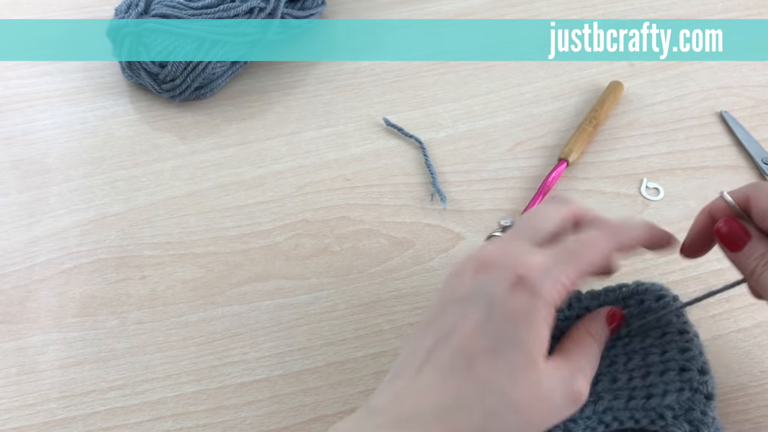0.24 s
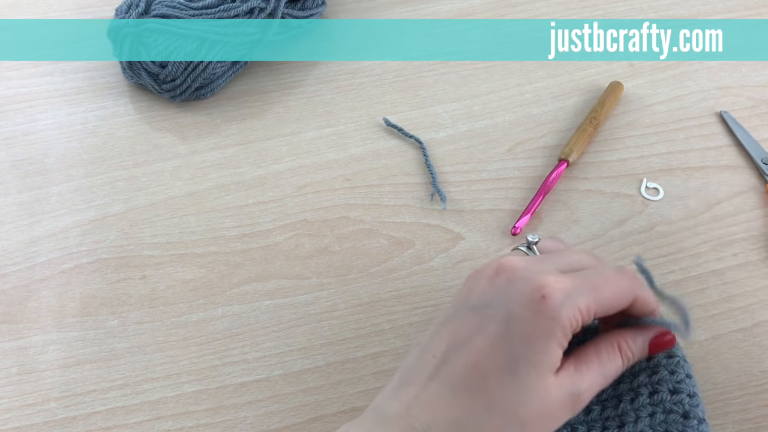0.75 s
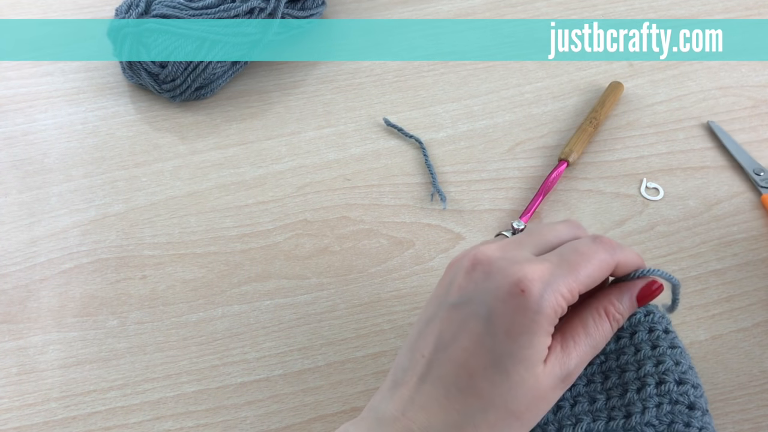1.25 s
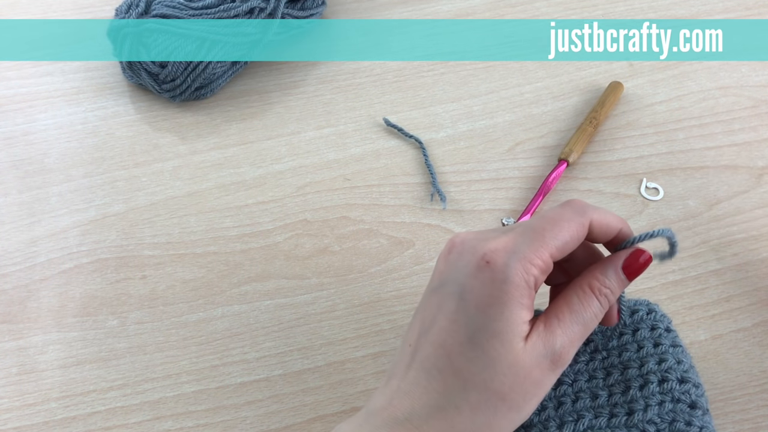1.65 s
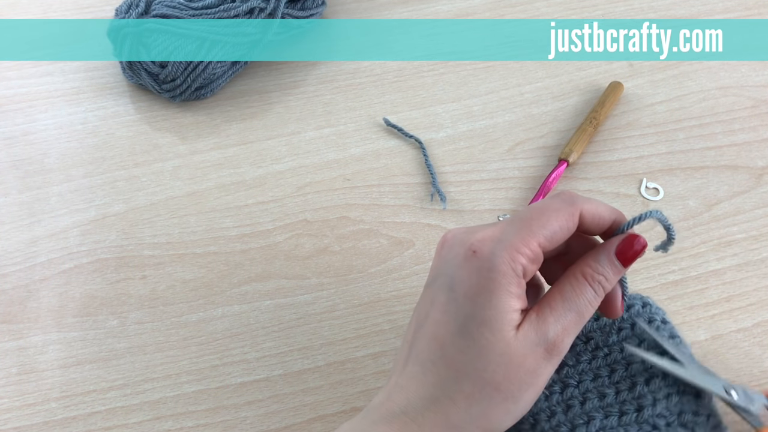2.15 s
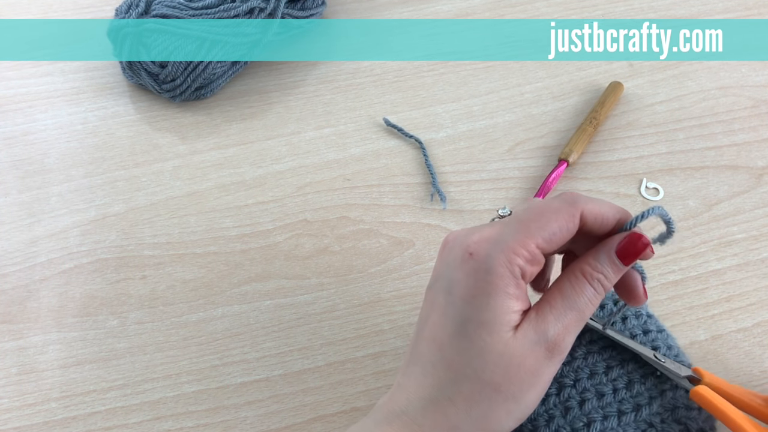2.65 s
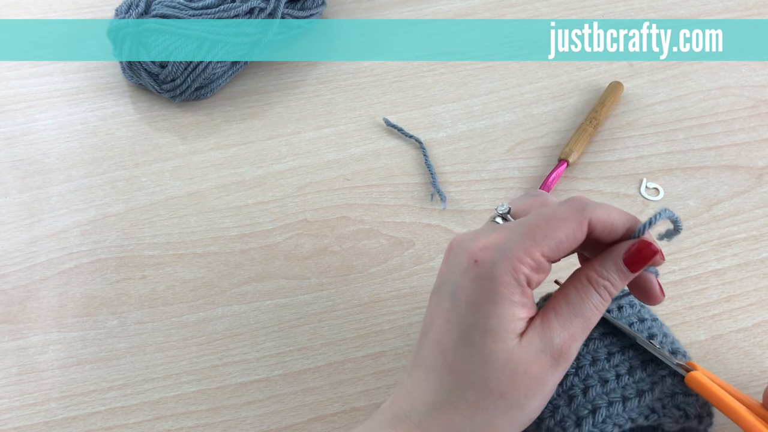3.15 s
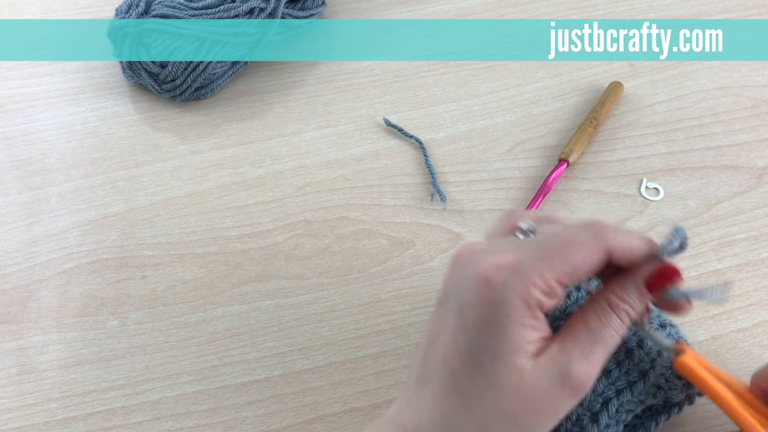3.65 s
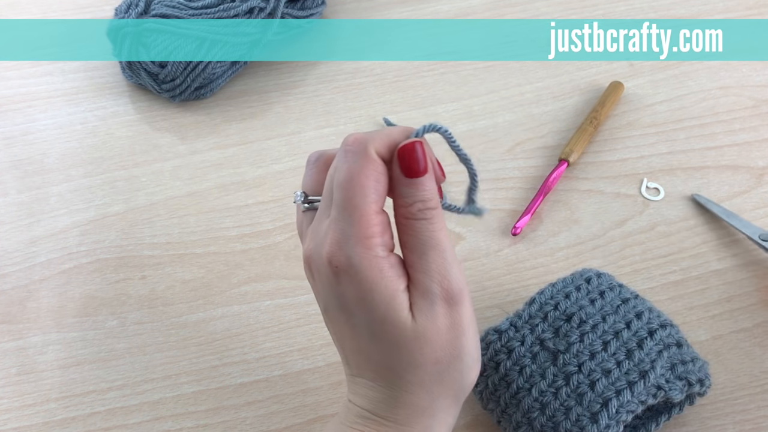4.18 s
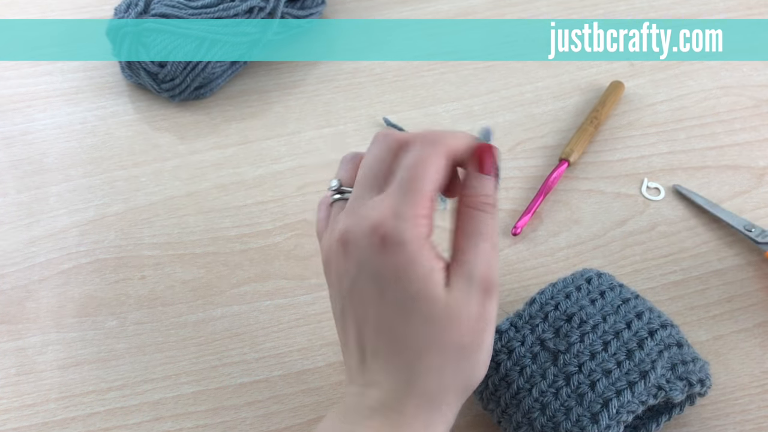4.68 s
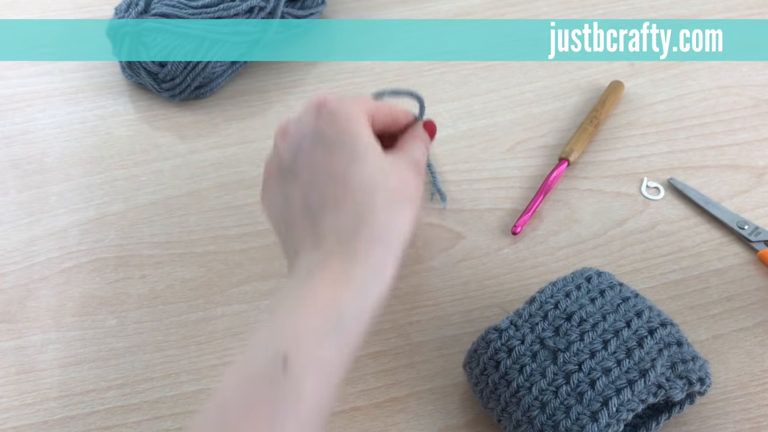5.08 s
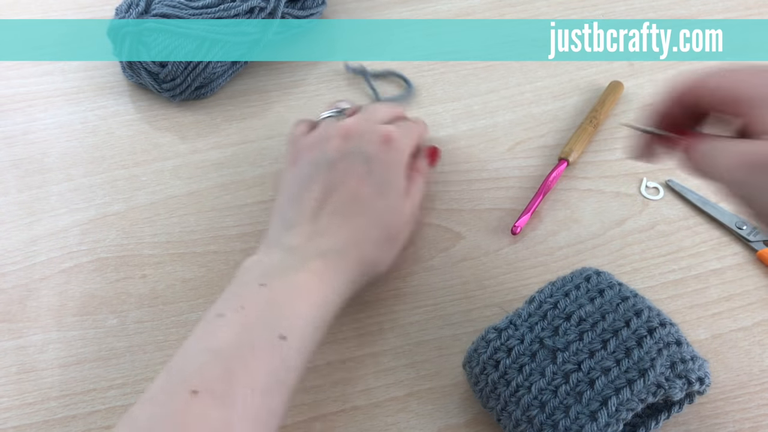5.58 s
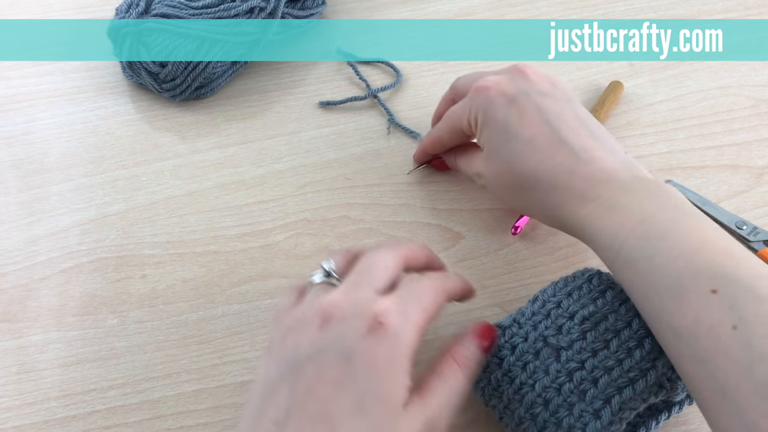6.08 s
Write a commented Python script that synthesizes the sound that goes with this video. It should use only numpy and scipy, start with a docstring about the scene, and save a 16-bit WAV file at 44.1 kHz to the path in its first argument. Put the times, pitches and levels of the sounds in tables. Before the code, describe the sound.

Close at a table in a small, quiet, lightly reverberant room, yarn rustles faintly, then scissors clink as they are picked up. Two soft blade hisses snip yarn. The scissors knock down and slide slightly, a small hard thing drops with a bright clatter and rocks to rest, and a steel needle rattles sharply at the end. Low wavering hum and faint hiss lie beneath.

```python
"""Scissors, yarn and a needle at a craft table

Close under a phone in a small quiet room, scissors are picked up, snip a strand of yarn and are laid down.
A small hard thing drops and rocks to rest; a steel needle clatters on the table top. Yarn rustles.
Contacts are short noise bursts that ring a body and thud the table; rubs are noise sent through resonances.
A low wavering hum and microphone hiss, both shaped noise, lie under it all."""
import sys
import numpy as np
from scipy import signal
from scipy.fft import rfft, irfft
from scipy.io import wavfile
from scipy.ndimage import uniform_filter1d

SR = 44100
rng = np.random.default_rng(int(sys.argv[2]) if len(sys.argv) > 2 else 0)


def inscribe(sig):
    """Save sig as 16-bit PCM at rate SR to the path in sys.argv[1].

    A 1-D sig is mono; a 2-D sig holds one channel per row.
    Samples are clipped to [-1, 1] before scaling.
    """
    pcm = np.round(np.clip(np.atleast_2d(sig).T, -1, 1) * 32767)
    wavfile.write(sys.argv[1], SR, pcm.astype(np.int16))


N = 278883  # length in samples


def undb(db):
    """Turn decibels into a gain."""
    return 10 ** (np.asarray(db) / 20)


def unit_rms(x):
    """Scale to rms 1."""
    return x / np.sqrt(np.mean(x ** 2))


def unit_peak(x):
    """Scale to peak 1."""
    return x / np.max(np.abs(x))


def band(x, low_hz, high_hz):
    """Keep only the sound between two frequencies."""
    return signal.sosfilt(signal.butter(2, [low_hz, high_hz], "bandpass", fs=SR, output="sos"), x)


def resonance(x, hz, width_hz):
    """One resonance, gain 1 at its centre."""
    b, a = signal.iirpeak(hz, hz / width_hz, SR)
    return signal.lfilter(b, a, x)


def ring_body(x, modes, damping):
    """A body rings at several pitches; more damping widens each one, so it dies sooner."""
    rung = 0
    for k, (hz, width_hz, db) in enumerate(modes):
        sign = (-1) ** k
        damped_hz = width_hz * damping
        gain = undb(db) * np.sqrt(hz / damped_hz / 4)
        rung = rung + sign * gain * resonance(x, hz, damped_hz)
    return rung


def rub_loudness(rubs):
    """Each rub swells and fades in straight decibel lines."""
    edge_db = 25.5  # a rub starts and ends this far under its peak
    t = np.arange(N) / SR
    gain = np.zeros(N)
    for start, swell, fade, peak_db in rubs:
        end = start + swell + fade
        level_db = np.interp(t, [start, start + swell, end], [peak_db - edge_db, peak_db, peak_db - edge_db])
        gain += np.where((t > start) & (t < end), undb(level_db), 0)
    return uniform_filter1d(gain, size=64)


def rub(rubs, modes, damping, plain_db, scatter_db, low_hz=600, top_hz=15500):
    """Rubbing is many dense slips of uneven size, heard plain and through a body. Rows: direct, to the room."""
    # every 32 samples the slips get a new random size
    sizes = np.repeat(rng.exponential(size=N // 32 + 1).clip(0, 2), 32)[:N]
    slips = band(rng.standard_normal(N) * undb(scatter_db * sizes), low_hz, top_hz)
    texture = unit_rms(undb(plain_db) * slips + ring_body(slips, modes, damping))
    return rub_loudness(rubs) * texture * undb([[0], [-9]])


# The table top's low tones: (pitch [Hz], width before damping [Hz], level [dB])
TABLE_TONES = [(143, 40, 0), (200, 40, -1), (277, 25, 0), (400, 110, -2)]
# One narrow tone that lingers in the table top: (pitch [Hz], width before damping [Hz], level [dB])
TABLE_LINGER = [(322, 7, 4)]


def table_thud(click, linger_db):
    """A blow on the table top sets off its low tones and one lingering tone."""
    low_tones = ring_body(click, TABLE_TONES, 0.77)
    lingering = ring_body(click, TABLE_LINGER, 0.77)
    return unit_peak(low_tones - undb(linger_db) * lingering)


def blows(taps, modes, touch):
    """A contact clicks, chatters for a few ms, rings a body and thuds the table. Rows: direct, to the room."""
    ring_db, damping, contact_ms, edge_db, top_hz, linger_db, room_db = touch
    out = np.zeros((2, N + SR))
    t = np.arange(SR // 2) / SR
    click = signal.unit_impulse(len(t))
    thud = table_thud(click, linger_db)
    body_ring = ring_body(click, modes, damping)
    for s, db, body_db, treble_db, thud_db in taps:
        chatter = rng.standard_normal(len(t)) * np.exp(-1000 * t / contact_ms)
        chatter[0] = 2.75  # the first click
        # the ring grows with the energy of the contact
        rung = chatter + undb(ring_db) * np.sqrt(np.sum(chatter ** 2)) * body_ring
        low = band(band(rung, 660, 1500), 660, 1500)  # filtered twice for steeper sides
        middle = band(rung, 1500, 3600)
        treble = band(rung, 3600, 7000)
        edge = band(rung, 7000, top_hz)
        knock = undb(body_db) * unit_peak(low) + unit_peak(middle)
        knock += undb(treble_db) * unit_peak(treble) + undb(treble_db + edge_db) * unit_peak(edge)
        place = slice(int(s * SR), int(s * SR) + len(t))
        out[:, place] += undb(db) * knock * undb([[0], [room_db]])
        out[0, place] += undb(db + thud_db) * thud  # the table top carries this straight to the phone stand
    return out[:, :N]


# Colour of the room tone and hiss: (frequency [Hz], relative level per Hz [dB])
AIR_COLOUR = [(13, -58), (22, -17), (38, -6), (112, -7.5), (185, -14.5), (224, -13.5), (358, -22),
              (527, -25.5), (573, -24.5), (776, -25.5), (7900, -44.5), (12600, -39.5), (16200, -43.5)]


def air():
    """Room tone and hiss: steady random noise shaped in frequency."""
    level_db = -72.5  # rms between 216 and 13000 Hz
    hz, db = np.transpose(AIR_COLOUR)
    f = np.maximum(np.fft.rfftfreq(N, 1 / SR), 1)
    shape = undb(np.interp(np.log(f), np.log(hz), db, left=-90))
    noise = irfft(rfft(rng.standard_normal(N)) * shape, N)
    return noise * undb(level_db) / np.std(band(noise, 216, 13000))


# The three drones: (pitch [Hz], width [Hz])
DRONES = [(55, 27), (113, 5), (160, 6)]
# How loud they are over time: (time [s], first drone level [dB], second level [dB], third level [dB])
DRONE_LEVELS = [(0.0, -66, -69, -69), (1.2, -67, -65.5, -71), (2.5, -69, -65, -76), (3.0, -68.5, -70, -80),
                (4.4, -69, -69, -79), (5.0, -69, -77, -76)]


def hum():
    """Three low drones of narrow noise, which wavers by itself; their levels drift."""
    s, *levels = np.transpose(DRONE_LEVELS)
    t = np.arange(N) / SR
    total = np.zeros(N)
    for (hz, width_hz), level_db in zip(DRONES, levels):
        drone = unit_rms(band(rng.standard_normal(N), hz - width_hz / 2, hz + width_hz / 2))
        total += undb(np.interp(t, s, level_db)) * drone
    return total


# How long each band takes to die by 60 dB: (band centre [Hz], time [s])
ROOM_FADES = [(250, 0.98), (500, 0.6), (1000, 0.61), (2000, 0.4), (4000, 0.43), (8000, 0.28),
              (14000, 0.063)]


def room(x):
    """The room answers with dense reflections; the highest treble dies first."""
    room_db, first_echo_s = -3.5, 0.00197
    t = np.arange(SR) / SR
    tail = np.zeros(SR)
    for hz, t60 in ROOM_FADES:
        reflections = band(rng.standard_normal(SR), hz / np.sqrt(2), min(hz * np.sqrt(2), 15500))
        tail += reflections * undb(-60 * t / t60)
    tail *= np.clip(t / first_echo_s - 1, 0, 1)  # silent until the first echo
    return undb(room_db) * signal.fftconvolve(x, tail / np.sqrt(np.sum(tail ** 2)))[:N]


# What colours the yarn: (pitch [Hz], width before damping [Hz], level [dB])
YARN_TONES = [(1190, 400, -59), (3350, 730, 21.5), (6130, 900, 11), (8770, 370, 11.5), (11600, 4300, -5.5)]
# Rustles: (start time [s], swell [s], fade [s], peak level [dB])
YARN_RUSTLES = [(.17, 0.095, .1, -71.5), (.57, 0.047, 0.35, -76.5), (2.05, 0.036, .02, -69),
                (2.4, 0.1, .04, -84), (3.86, 0.071, .02, -78), (3.95, .014, .04, -70.5),
                (4.02, 0.004, 0.056, -69), (5.3, .08, .3, -66)]


def yarn():
    """Yarn rustles: dense slips of noise with broad tones."""
    return rub(YARN_RUSTLES, YARN_TONES, 0.72, 8.2, 5.3)


# The table top shakes under the clatter: (start time [s], swell [s], fade [s], peak level [dB])
TABLE_RUMBLE = [(5.08, .06, .45, -54.5)]


def table_rumble():
    """The table top shakes under the clatter and rumbles at its own low tones."""
    return rub(TABLE_RUMBLE, TABLE_TONES, 0.8, -12, 6, low_hz=100, top_hz=650)


# What rings in the needle: (pitch [Hz], width before damping [Hz], level [dB])
NEEDLE_TONES = [(2290, 200, 0), (3250, 300, -2), (3900, 400, -2), (6400, 500, -2), (8900, 600, 2),
                (9870, 600, 0), (11280, 50, 4), (12135, 25, 9), (15000, 900, -4)]
# Blows, in the middle band; the last three levels are against it:
# (time [s], peak level [dB], low body level [dB], treble level [dB], table thud level [dB])
NEEDLE_TABLE_TAPS = [(6.1783, -38, -2, 13, -13), (6.1963, -39.5, -8, 1, -15), (6.2228, -42.5, 0, 8, -9.5),
                     (6.2385, -30, -25, 10, -40), (6.2412, -22.5, -11, -9, -40), (6.2544, -43, -6, 6, -25),
                     (6.2741, -32, -12, -2, -18), (6.2772, -26, -13.5, -20, -26.5),
                     (6.2794, -40.5, -10, 11.5, -20), (6.2934, -38.5, -22, 11, -34),
                     (6.2994, -36, -14, 4, -35), (6.3164, -41, -9, 6, -28)]
# How each blow is made: (ring [dB], damping [factor], contact fade [ms], edge over treble [dB],
# edge top [Hz], lingering table tone [dB], share sent to the room [dB])
NEEDLE_TOUCH = (-6., .65, 1.5, 4.5, 14500, -14, -3)


def needle_taps():
    """A steel needle rings at its high tones as it clatters on the table top."""
    return blows(NEEDLE_TABLE_TAPS, NEEDLE_TONES, NEEDLE_TOUCH)


# Blows, in the middle band; the last three levels are against it:
# (time [s], peak level [dB], low body level [dB], treble level [dB], table thud level [dB])
FINGER_TAPS = [(6.1361, -48.5, 0, 2, -2)]
# How each blow is made: (ring [dB], damping [factor], contact fade [ms], edge over treble [dB],
# edge top [Hz], lingering table tone [dB], share sent to the room [dB])
FINGER_TOUCH = (-23, 2.1, 3., 1, 15000, -12, -2.5)


def fingertip():
    """A fingertip lands on the table with a dull, barely ringing tap."""
    return blows(FINGER_TAPS, NEEDLE_TONES, FINGER_TOUCH)  # the ring is very weak and strongly damped


# The needle rolls: (start time [s], swell [s], fade [s], peak level [dB])
NEEDLE_ROLLS = [(6.19, .13, .05, -37.5)]


def needle_roll():
    """The needle rolls: dense slips of noise coloured by its tones."""
    return rub(NEEDLE_ROLLS, NEEDLE_TONES, 0.64, 6, 3)


# What rings in the dropped thing: (pitch [Hz], width before damping [Hz], level [dB])
DROPPED_TONES = [(714, 25, 2), (835, 30, 0), (1070, 100, 0), (1400, 25, -2), (1660, 25, 0), (1800, 40, -3),
                 (2230, 60, -4), (3200, 700, 1), (4300, 800, -2), (5830, 500, -4), (8850, 200, -3),
                 (10000, 500, -4)]
# Blows, in the middle band; the last three levels are against it:
# (time [s], peak level [dB], low body level [dB], treble level [dB], table thud level [dB])
DROPPED_CLATTER = [(5.1044, -31, -3.5, -16, -26), (5.1138, -19, -7.5, -9.5, -27),
                   (5.1294, -23, -10, 9.5, -36), (5.1394, -25.5, -3.5, -7, -24),
                   (5.1474, -29.5, -5, -13, -32), (5.1594, -24, -3.5, -13, -27),
                   (5.1844, -25, -7, -18, -23), (5.2634, -29, -9, -9.5, -26)]
# Rocking to rest: (time [s], peak level [dB], table thud level against it [dB])
DROPPED_ROCKS = [(5.3883, -39, -10), (5.4916, -47, 0), (5.5, -43.5, -3.5), (5.5924, -48, -8),
                 (5.67, -51.5, -7), (5.7247, -55.5, -7), (5.7756, -58.5, -7), (5.8092, -61, -6)]
# All rocks share one colour: (low body level [dB], treble level [dB])
DROPPED_ROCK_COLOUR = (-4, -7.5)
# How each blow is made: (ring [dB], damping [factor], contact fade [ms], edge over treble [dB],
# edge top [Hz], lingering table tone [dB], share sent to the room [dB])
CLATTER_TOUCH = (-8., .65, 3.4, -2.5, 12500, -9, -0.8)
ROCK_TOUCH = (-1.3, 0.9, 2.5, .6, 14000, -1.5, -1)
# The rattle among the blows: (start time [s], swell [s], fade [s], peak level [dB])
DROPPED_RATTLE = [(5.12, .05, 0.13, -46.5)]


def dropped_thing():
    """A small hard thing clatters, rattles and rocks to rest in quickening knocks that mostly weaken."""
    clatter = blows(DROPPED_CLATTER, DROPPED_TONES, CLATTER_TOUCH)
    rock_taps = [(s, db, *DROPPED_ROCK_COLOUR, thud_db) for s, db, thud_db in DROPPED_ROCKS]
    rocks = blows(rock_taps, DROPPED_TONES, ROCK_TOUCH)
    rattle = rub(DROPPED_RATTLE, DROPPED_TONES, 2.2, -3.5, 12)
    return clatter + rocks + rattle


# What rings in the scissors: (pitch [Hz], width before damping [Hz], level [dB])
SCISSORS_TONES = [(1040, 140, 2), (1920, 200, 3), (2250, 200, -8), (3020, 200, 0), (3550, 200, -9),
                  (4580, 180, -2), (5900, 260, -4), (9150, 300, -8), (12700, 400, -6)]
# What colours the rubbing blades: (pitch [Hz], width before damping [Hz], level [dB])
BLADE_TONES = [(3300, 670, 5.5), (6540, 330, -8.5), (8040, 360, -11), (10200, 1700, 1), (13900, 3200, 1)]
# Blows, in the middle band; the last three levels are against it:
# (time [s], peak level [dB], low body level [dB], treble level [dB], table thud level [dB])
HAND_BLOWS = [(1.0921, -43.5, 3, -20, -8.5), (1.0979, -38, -18, -2.5, -20), (1.1024, -34.5, -10, -28, -22),
              (1.1119, -37.5, -1.5, -30, -13), (1.1871, -32, -8, -4, -26), (1.1946, -35.5, -11, -16, -28),
              (1.2063, -34, -14, -19, -18.5), (1.2144, -39, -8, -19, -18), (4.936, -33.5, -22, 6, -27),
              (4.9431, -31, -10.5, -24, -27.5)]
TABLE_BLOWS = [(1.3384, -51, 6, -20, -10), (4.2686, -33.5, -7.5, -1, -21.5), (4.2851, -37, -13, -14, -29)]
SMALL_TICKS = [(1.4187, -37.5, -8.5, 0, -23), (1.985, -63, -6, -12, -15), (2.0838, -58, -14, -6, -15),
               (3.7706, -65, -2, -17, -14), (4.007, -41, -23, 3, -38)]
# How each blow is made: (ring [dB], damping [factor], contact fade [ms], edge over treble [dB],
# edge top [Hz], lingering table tone [dB], share sent to the room [dB])
HAND_TOUCH = (-4., .6, 3.6, -3, 11500, -4, -1.9)
TABLE_TOUCH = (4, 0.8, 4, -.6, 12500, -4, -0.7)
TICK_TOUCH = (-10., 1.05, 1.3, 1, 14002, -4, -5.5)
# Snips, the slide and its lingering lowest tone: (start time [s], swell [s], fade [s], peak level [dB])
BLADE_SNIPS = [(3.12, .075, .012, -65), (3.225, .014, .012, -61), (3.56, .045, .05, -59),
               (3.59, .027, .008, -59)]
SCISSORS_SLIDE = [(4.64, .038, .25, -71.5)]
SCISSORS_SLIDE_LOW = [(4.62, .14, .3, -73.5)]


def scissors():
    """Metal rings when knocked, the blades hiss as they rub in a snip, and a slide draws out the tones."""
    knocks = (blows(TABLE_BLOWS, SCISSORS_TONES, TABLE_TOUCH) + blows(HAND_BLOWS, SCISSORS_TONES, HAND_TOUCH)
              + blows(SMALL_TICKS, SCISSORS_TONES, TICK_TOUCH))
    snips = rub(BLADE_SNIPS, BLADE_TONES, 0.93, -10.5, 3.9)
    slide = rub(SCISSORS_SLIDE, SCISSORS_TONES, 0.35, -30, 2.5, top_hz=7000)
    slide_low = rub(SCISSORS_SLIDE_LOW, SCISSORS_TONES[:1], 0.8, -30, 2.5, top_hz=2000)
    return knocks + snips + slide + slide_low


def scene():
    """Everything on the table sounds directly and into the room, over the hum and hiss."""
    soft = yarn() + table_rumble()
    direct, to_room = soft + needle_taps() + fingertip() + needle_roll() + dropped_thing() + scissors()
    return (air() + hum() + room(to_room) + direct)[None]


# Overall treble colour, a broad lift near 7 kHz and narrow dips: (pitch [Hz], width [Hz], level [dB])
TREBLE_COLOUR = [(4940, 170, -6), (7170, 1500, 4.5), (11230, 260, -11), (11200, 140, 3)]


def record(dry):
    """Lifts and dips colour the treble; the sound is limited to below a top frequency."""
    top_hz = 15950
    for hz, width_hz, db in TREBLE_COLOUR:
        dry = dry + (undb(db) - 1) * resonance(dry, hz, width_hz)
    return signal.sosfilt(signal.ellip(10, 0.2, 60, top_hz, fs=SR, output="sos"), dry)


dry = scene()
out = record(dry)
inscribe(out)
```